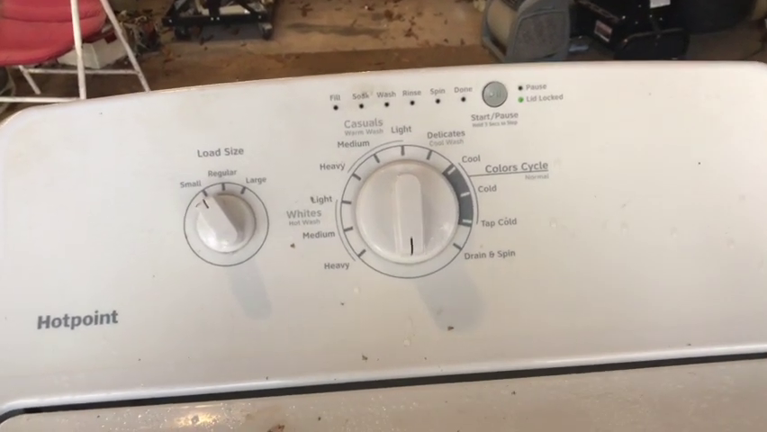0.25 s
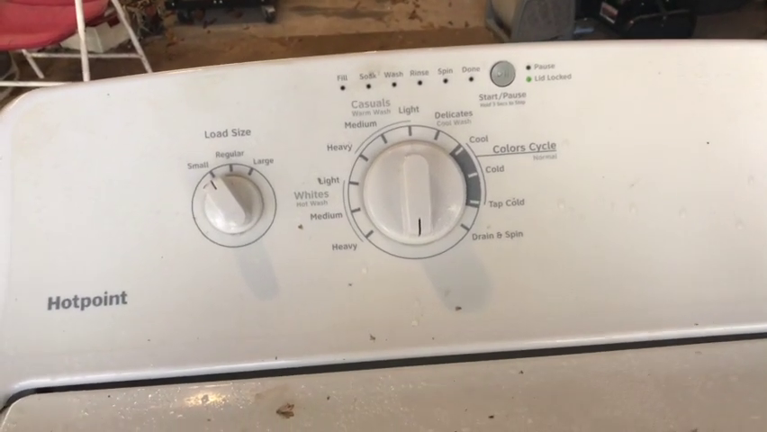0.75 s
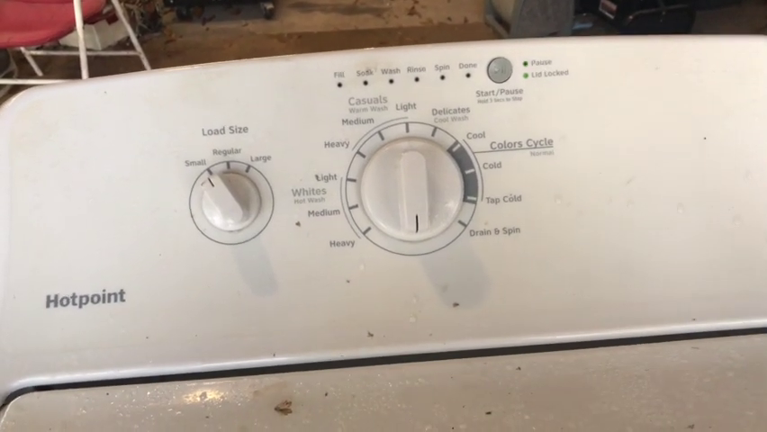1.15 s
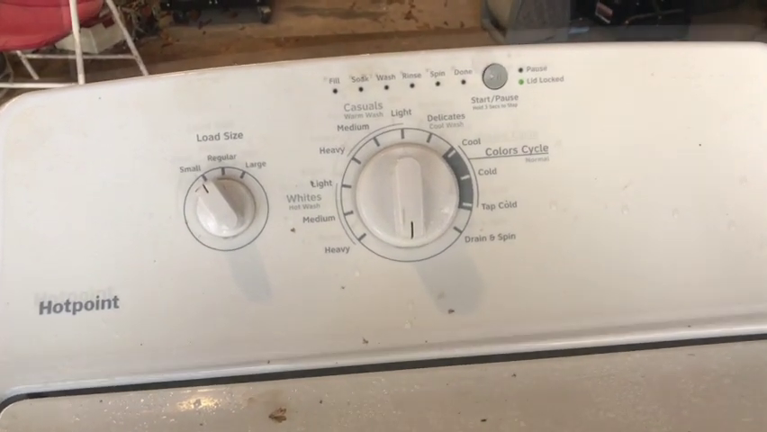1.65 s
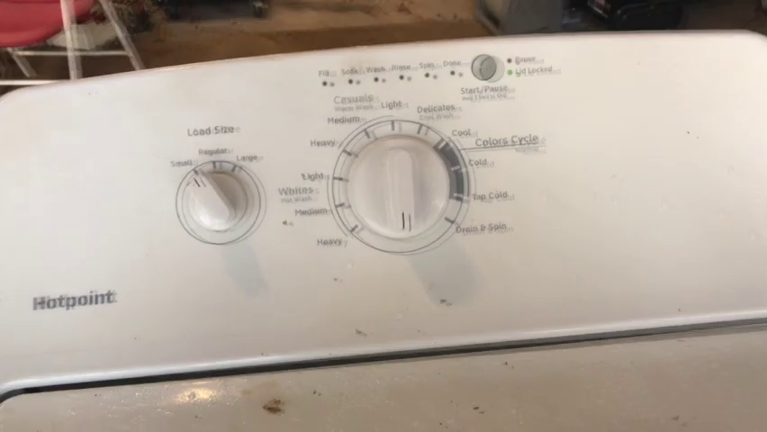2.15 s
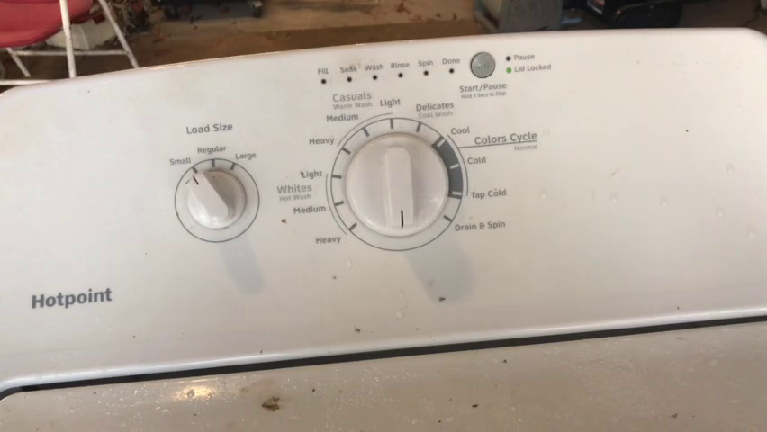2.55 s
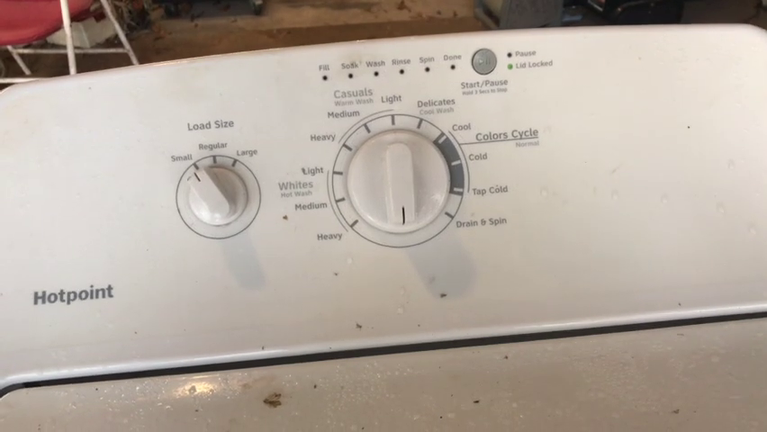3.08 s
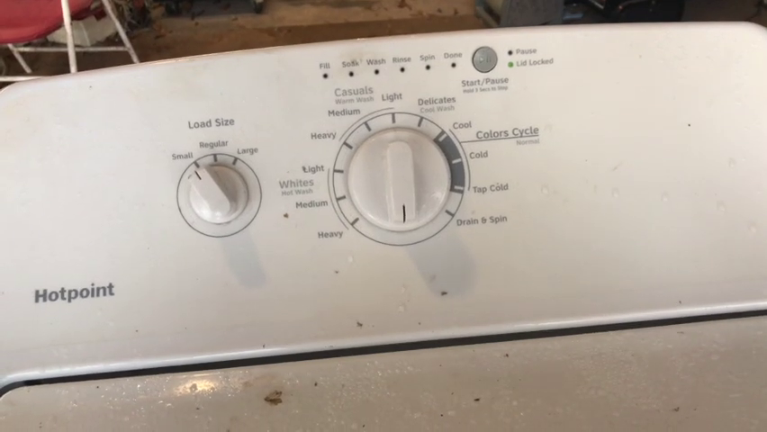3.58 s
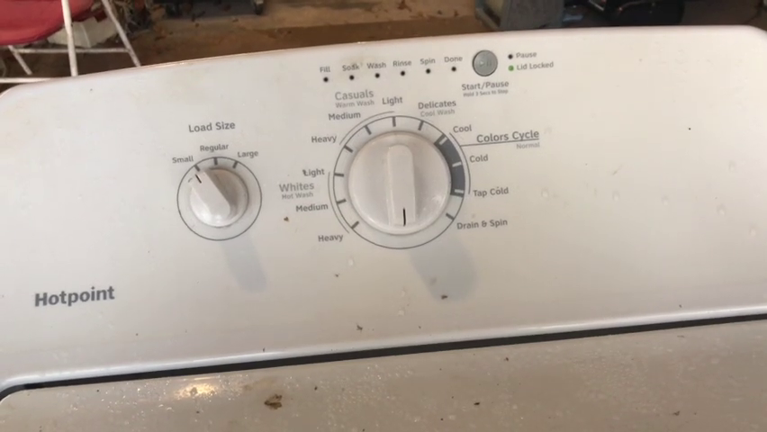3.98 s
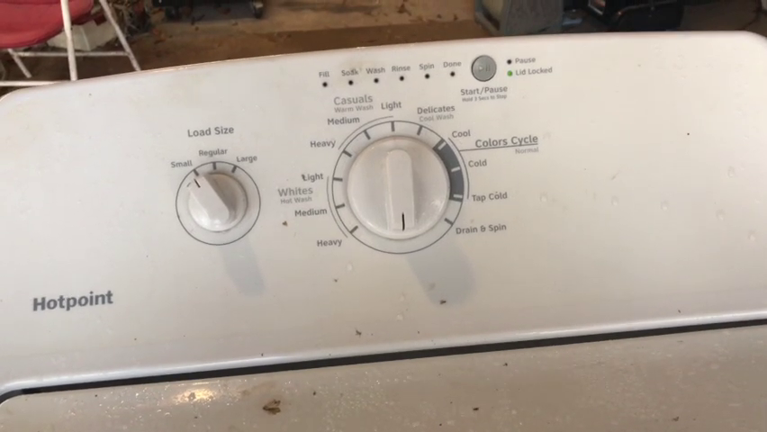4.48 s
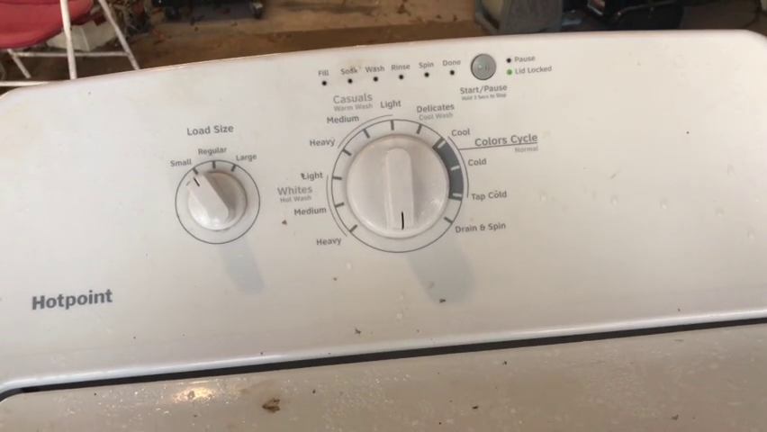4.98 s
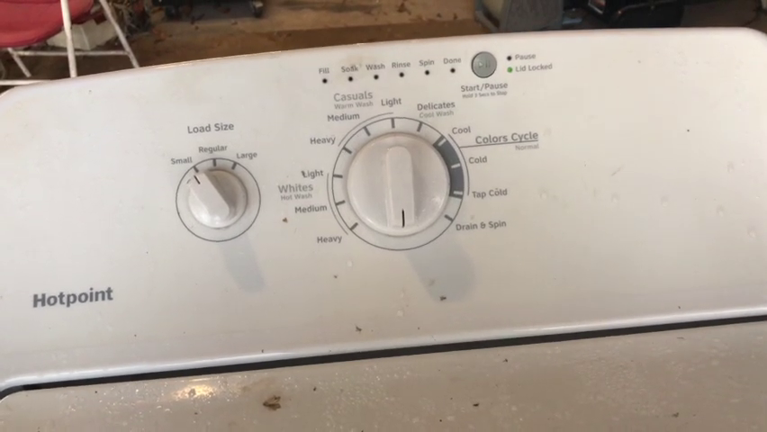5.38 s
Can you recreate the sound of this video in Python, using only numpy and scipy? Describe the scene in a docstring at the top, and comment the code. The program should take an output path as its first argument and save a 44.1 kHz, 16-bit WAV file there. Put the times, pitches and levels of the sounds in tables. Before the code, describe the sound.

An empty top-load washing machine spins at full speed on worn bearings, a loud, rough, throbbing roar heard close above its control panel.

```python
"""A rough, throbbing roar: an empty top-load washing machine spins at full speed on worn bearings, heard from
just above its control panel. Balls knock over pitted races and ring the panels, basket, tub, lid and frame;
dry steel hisses on top. Random knocks through resonant filters make these sounds.
The roar throbs with the turns of the drum and the slower ball cage, sways with the tub, now and then swells, dips
or runs slack, and grows brighter after two seconds. Faint puffs of high hiss flicker in the first 2.6 s."""
import sys
import numpy as np
from scipy import signal
from scipy.fft import rfft, irfft
from scipy.io import wavfile
from scipy.ndimage import uniform_filter1d

SR = 44100
rng = np.random.default_rng(int(sys.argv[2]) if len(sys.argv) > 2 else 0)


def bounce(signal):
    """Save signal as a 16-bit WAV file at the path given by the first command-line argument."""
    frames = np.transpose(np.atleast_2d(signal))
    limited = np.clip(frames, -1, 1)
    pcm = np.round(limited * 32767).astype(np.int16)
    wavfile.write(sys.argv[1], SR, pcm)


N = 248283
TIME = np.arange(N) / SR  # s
FREQS = np.maximum(np.fft.rfftfreq(2 ** 18, 1 / SR), 1)  # Hz, kept above zero for the divisions

DRUM_HZ, CAGE_HZ, SWAY_HZ = 8.7, 3.5, 1.3  # turns of the drum and the ball cage, sway of the tub
HEAVY_TURN = 0.47  # point in a turn where the drum's heavy side loads the bearing
SWAY_PEAK_S, BUNCH_PEAK_S, FLUTTER_PEAK_S = 0.074, 0.11, 0.067  # a moment when each slow cycle bears hardest
UNEVEN_S, SLACK_S = 0.028, 0.017  # half-lengths of an uneven moment and of a lull
CATCH_S, CATCH_DB = 0.023, 3  # delay after a lull and extra clatter of the panels as the load returns
CHURN_DB = 1  # uneven loudness of panels and lid from one half turn to the next
RUMBLE_WANDER_DB = 2  # slow unevenness of the frame's rumble
TOP_HZ = 15550  # upper limit of the sound


def pits(count, per_s, spread_db):
    """Sharp knocks of uneven size as balls drop into pits, over the fine grain of the steel."""
    chance = rng.random(count)
    size = rng.standard_normal(count)
    grain = rng.standard_normal(count)
    knocks = (chance < per_s / SR) * undb(spread_db * size) * np.sign(grain)
    return unit(unit(knocks) + .5 * grain)


def rolling(repeat, per_s, spread_db):
    """Contact force: partly the same pits met on every turn of drum and cage, partly ever new paths of the balls."""
    drum_track, cage_track = [np.resize(pits(int(SR / hz), per_s, spread_db), N) for hz in (DRUM_HZ, CAGE_HZ)]
    same_pits = unit(drum_track + cage_track)
    new_paths = pits(N, per_s, spread_db)
    return np.sqrt(repeat) * same_pits + np.sqrt(1 - repeat) * new_paths  # repeat: share of the power


def load(drum_db):
    """Swing of the bearing load, in dB on multiples 1, 2, .. of the drum's turn."""
    turn = 2 * np.pi * (DRUM_HZ * TIME - HEAVY_TURN)
    return undb(sum(db * np.cos(k * turn) for k, db in enumerate(drum_db, 1)))


def throb(sway_db, bunch_db, flutter_db):
    """The tub sways slowly on its springs; bunched balls swing the load two and four times a cage turn."""
    sway = sway_db * cycle(SWAY_HZ, SWAY_PEAK_S)
    bunch = bunch_db * cycle(2 * CAGE_HZ, BUNCH_PEAK_S)
    flutter = flutter_db * cycle(4 * CAGE_HZ, FLUTTER_PEAK_S)
    return undb(sway + bunch + flutter)


def swirl(x, span_hz, drum_db, cage_db, size):
    """As drum and balls go round, each patch of the spectrum is driven hardest at its own point of the turn."""
    hz, s, cells = signal.stft(x, SR, nperseg=size, noverlap=size * 3 // 4)
    rates = [DRUM_HZ, 2 * DRUM_HZ, 2 * CAGE_HZ, 4 * CAGE_HZ]
    swing_db = 0
    for rate, db in zip(rates, (*drum_db, *cage_db)):
        points = np.exp(2j * np.pi * rng.random(size))  # random points of the turn, one every span_hz
        patch = np.interp(hz / span_hz, np.arange(size), points)
        swing_db = swing_db + db * np.outer(patch, np.exp(2j * np.pi * rate * s)).real
    return signal.istft(cells * undb(swing_db), SR, nperseg=size, noverlap=size * 3 // 4)[1][:N]


# short uneven moments in the roar, where each part briefly swells or dips by its own amount:
# (time [s], tub level [dB], basket level [dB], panel level [dB], lid level [dB])
UNEVEN_MOMENTS = [(.105, .5, 9.5, -2.5, 2), (.27, 5, 0, 1, 2), (.345, -0.5, 3.5, 3, 1),
                  (.52, 1.5, 4, 2.5, 2), (.725, 2, 4.5, -3, 0), (.79, -4.5, 4.5, 0, -4),
                  (.98, 1.5, 2, 0, 2), (1.13, 6, -1.5, 2, 2), (1.235, 2.5, 3.5, -1.5, 1),
                  (1.65, 3, 3, -1.5, 1), (2.32, 2, 3.5, -0.5, 0.5), (2.835, 3, 6, 3, 0),
                  (3.07, -8, 2.5, 1.5, 4), (3.28, 1, 3, -0.5, 4), (3.38, 2.5, 3.5, 1.5, 2),
                  (3.505, 0, 5.5, -3, -3), (3.995, 5.5, -1, 1.5, 2.5), (4.2, 5, 5, -0.5, 1),
                  (4.445, 3, 7.5, 0.5, 2), (4.665, -0.5, 2.5, -3, 6), (4.76, 6, -0.5, 2, 0),
                  (4.995, 6, 4, 2.5, -1), (5.2, 2, -1, 2, -0.5), (5.57, 11.5, 3, -0.5, -6)]


def uneven_moments():
    """Gains of tub, basket, panels and lid: at each moment a short smooth swell or dip of each part."""
    return undb(sum(np.outer(db, bump(s, UNEVEN_S)) for s, *db in UNEVEN_MOMENTS))


# lulls, where the bearing runs slack; each part later takes its own share of the depth:
# (time [s], depth [dB])
LULLS = [(.303, 2.5), (0.455, 5), (1.028, 6.5), (1.323, 4.5), (1.457, 4), (2.987, 5.5), (3.443, 3.5),
         (3.565, 9), (4.245, 7.5), (4.482, 4.5), (5.053, 5.5), (5.273, 4.5)]


def lulls():
    """Gains of the drop as the bearing runs slack, and of the clatter as it takes up its load again."""
    slack = undb(-sum(db * bump(s, SLACK_S) for s, db in LULLS))
    catch = undb(CATCH_DB * sum(bump(s + CATCH_S, SLACK_S) for s, _ in LULLS))
    return slack, catch


# resonances of the side panels: (pitch [Hz], width [Hz], relative level [dB])
PANEL_TONES = [(447, 112, -20), (539, 40, -16.5), (588.6, 25.2, -7.5), (635, 46, -14), (705.8, 54, -7),
               (769, 27, -10.5), (826.5, 49, -10.5), (869, 52.6, -8), (976, 93, -15)]


def panels():
    """The side panels roar and flutter with the turns of drum and cage as the knocks ring the sheet steel."""
    roar = ring(rolling(repeat=0.42, per_s=1800, spread_db=2), resonances(PANEL_TONES))
    roar = swirl(roar, span_hz=142.5, drum_db=(1.5, 1.5), cage_db=(1.4, 1.4), size=1024)
    return steady(roar, span_s=0.045) * load(drum_db=(.3, -.4)) * undb(0.36)


# resonances of the spin basket: (pitch [Hz], width [Hz], relative level [dB])
BASKET_TONES = [(281.6, 104, -10), (332, 42.7, -4.5), (342.8, 17, -1), (367.7, 38, -3.5)]


def basket():
    """The knocks ring the spin basket, which booms and swells once a turn."""
    force = rolling(repeat=0.4, per_s=1400, spread_db=3.0)
    boom = steady(ring(force, resonances(BASKET_TONES)), span_s=0.11)
    return boom * load(drum_db=(1.4, 0, .4)) * undb(0.22)


# resonances of the outer tub: (pitch [Hz], width [Hz], relative level [dB])
TUB_TONES = [(142.5, 20, -10), (196.2, 51.5, 0.5), (222.6, 64, -11), (219.9, 15.2, 5)]


def tub():
    """The knocks make the hollow outer tub drone."""
    force = rolling(repeat=0.32, per_s=1500, spread_db=3.5)
    drone = steady(ring(force, resonances(TUB_TONES)), span_s=0.078)
    return drone * load(drum_db=(.5, 0, .4)) * undb(-0.03)


# resonances of the lid: (pitch [Hz], width [Hz], relative level [dB])
LID_TONES = [(1132.5, 79, 1), (1253, 130, -2.5), (1375, 89, -1.5), (1540, 33, -8.5)]


def lid():
    """The thin lid chatters in a higher voice, its knocks more uneven in size."""
    chatter = ring(rolling(repeat=0.31, per_s=1800, spread_db=5.5), resonances(LID_TONES))
    chatter = swirl(chatter, span_hz=118.0, drum_db=(3.2, 1.8), cage_db=(2.8, 1.6), size=1024)
    return steady(chatter, span_s=0.11) * load(drum_db=(.4, -.3)) * undb(-0.14)


# resonances of the frame: (pitch [Hz], width [Hz], relative level [dB])
FRAME_TONES = [(52, 22, -27), (68.7, 17, -15.5), (82.8, 15, -17)]


def frame():
    """The heavy frame rings low and rumbles under everything, a little unevenly."""
    force = rolling(repeat=0.22, per_s=1700, spread_db=1.5)
    rumble = steady(ring(force, resonances(FRAME_TONES)), span_s=0.21)
    return rumble * undb(RUMBLE_WANDER_DB * wander(DRUM_HZ)) * undb(-0.1)


# colour of the rasp outside the cabinet: (pitch [Hz], relative level [dB])
RASP_TONE = [(1000, -44), (1600, -31.5), (2300, -35.5), (3200, -39.5), (3900, -54), (5000, -59),
             (6000, -56), (7500, -63), (8100, -61.5), (9400, -62.5), (10400, -69), (11000, -68),
             (13900, -65.5), (15500, -72.5)]
# resonances of the bearing housing: (pitch [Hz], width [Hz], relative level [dB])
HOUSING_TONES = [(1825, 45, -32.5), (2006, 63, -28.5), (2137, 67, -31.5), (2324, 46, -30.5),
                 (2630, 49, -34), (3476, 57, -40.5), (4370, 100, -53)]


def rasp():
    """Dry steel scrapes and rings the bearing housing; the cabinet muffles the top."""
    hz, db = np.transpose(RASP_TONE)
    colour = undb(np.interp(np.log(FREQS), np.log(hz), db)) ** 2
    low_cut = 1 / (1 + (hz[0] / FREQS) ** 8)
    force = rolling(repeat=0.44, per_s=8000, spread_db=2.5)
    scrape = ring(force, colour * low_cut + resonances(HOUSING_TONES))
    scrape = swirl(scrape, span_hz=129.4, drum_db=(1.3, .9), cage_db=(1.3, 1.0), size=1024)
    return unit(scrape) * load(drum_db=(.45, .15, .2)) * undb(0.93)


# faint puffs of high hiss: (time [s], level [dB], half-length [s])
PUFF_TIMES = [(.07, -69, .03), (0.677, -64, .02), (.905, -63, 0.026), (1.36, -61, 0.023),
              (1.585, -63, .035), (2.523, -59, .03)]
# the band of that hiss: (pitch [Hz], width [Hz], relative level [dB])
PUFF_TONE = [(12800, 6500, 0)]


def puffs():
    """The treble flickers now and then: smooth swells of high, filtered noise."""
    swell = sum(undb(db) * bump(s, length) for s, db, length in PUFF_TIMES)
    hiss = unit(ring(rng.standard_normal(N), resonances(PUFF_TONE)))
    return swell * hiss


def resonances(modes):
    """Power response of steep-sided resonances."""
    return sum(undb(db) ** 2 / (1 + ((FREQS / hz - hz / FREQS) * hz / width) ** 2) ** 2
               for hz, width, db in modes)


def ring(x, power):
    """Pass x through the causal filter that has this power response."""
    cepstrum = irfft(np.log(power) / 2)
    size = len(cepstrum)
    # folding the second half onto the first lets the filter ring only after each knock
    cepstrum[1:size // 2] *= 2
    cepstrum[size // 2 + 1:] = 0
    return irfft(rfft(x, size) * np.exp(rfft(cepstrum)), size)[:N]


def steady(x, span_s):
    """Hold the rms near 1 over spans longer than span_s."""
    size = max(int(span_s * SR), 2)
    power = uniform_filter1d(uniform_filter1d(x ** 2, size), size)
    return x / np.sqrt(power)


def bump(s, length_s):
    """A smooth swell of height 1 around time s."""
    return np.exp(-((TIME - s) / length_s) ** 2)


def wander(per_s):
    """A smooth random course with a spread near 1, newly drawn per_s times a second."""
    size = int(SR / per_s)
    held = np.repeat(rng.standard_normal(N // size + 1), size)[:N]
    return unit(uniform_filter1d(held, size))


def cycle(hz, peak_s):
    """A swing between -1 and 1 that tops at peak_s."""
    return np.cos(2 * np.pi * hz * (TIME - peak_s))


def undb(db):
    """Decibels to gain."""
    return 10 ** (np.asarray(db) / 20)


def unit(x):
    """Scale to rms 1."""
    return x / np.sqrt(np.mean(x ** 2))


def gains(table):
    """The dB columns of a curve as gains for each sample."""
    s, *columns = np.transpose(table)
    return [undb(np.interp(TIME, s, c)) for c in columns]


# slow level of each part, before its own trim and swings; the roar sags, then opens up as the listener
# shifts over the panel: (time [s], tub level [dB], basket level [dB], panel level [dB], lid level [dB],
# rasp level [dB], frame level [dB])
SLOW_LEVELS = [(0, -17.5, -18.5, -19.5, -29.5, -36.5, -32.5), (1, -18.5, -15.4, -19.5, -30.5, -37.5, -34.5),
               (2.12, -21, -17, -21.0, -32, -37.5, -39.5), (2.38, -18.5, -15.5, -18.5, -27.0, -33, -35.8),
               (4, -17.5, -17, -18, -27, -32.0, -33.5), (5.63, -19, -16, -18, -26.1, -32.0, -35.5)]


def scene():
    """All parts, shaken by the worn bearing: most throb, swell, dip and slacken, each to its own degree."""
    tub_level, basket_level, panel_level, lid_level, rasp_level, frame_level = gains(SLOW_LEVELS)
    tub_uneven, basket_uneven, panel_uneven, lid_uneven = uneven_moments()
    slack, catch = lulls()
    churn = undb(CHURN_DB * wander(2 * DRUM_HZ))
    # the powers of slack and catch set how strongly each part follows them
    roar = panels() * panel_level * panel_uneven * throb(sway_db=.5, bunch_db=.55, flutter_db=0.64)
    roar = roar * slack ** 1.18 * catch
    boom = basket() * basket_level * basket_uneven * throb(sway_db=0, bunch_db=0.6, flutter_db=1.1)
    boom = boom * slack ** 1.5
    drone = tub() * tub_level * tub_uneven * throb(sway_db=.5, bunch_db=.65, flutter_db=0.2) * slack ** 0.42
    chatter = lid() * lid_level * lid_uneven * throb(sway_db=0.8, bunch_db=0.1, flutter_db=0.65)
    chatter = chatter * slack ** 0.86 * catch ** .4
    rumble = frame() * frame_level * slack ** .4
    hiss = rasp() * rasp_level * throb(sway_db=0.3, bunch_db=0.65, flutter_db=0.4) * slack ** .4
    return ((roar + chatter) * churn + boom + drone + rumble + hiss + puffs())[None]


def record(dry):
    """Round off the peaks near full scale and cut the treble above TOP_HZ."""
    rounded = dry / (1 + (dry / 1.06) ** 10) ** .1
    return signal.sosfilt(signal.ellip(10, .1, 80, TOP_HZ, fs=SR, output="sos"), rounded)


dry = scene()
out = record(dry)
bounce(out)
```